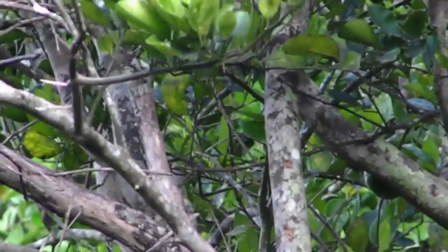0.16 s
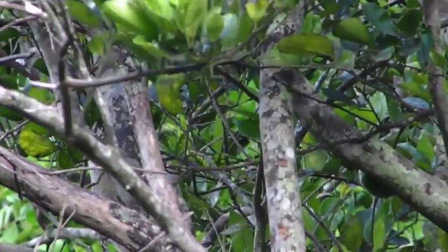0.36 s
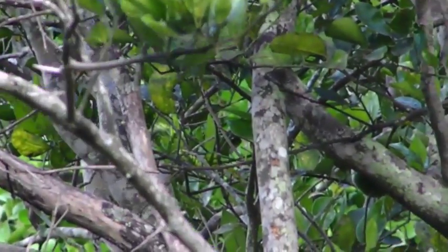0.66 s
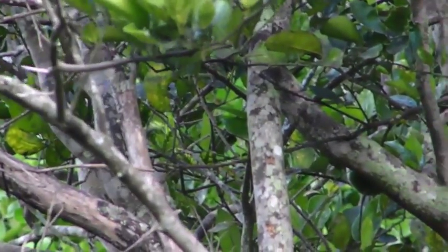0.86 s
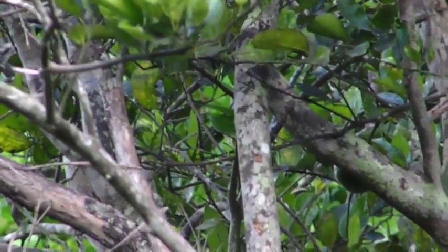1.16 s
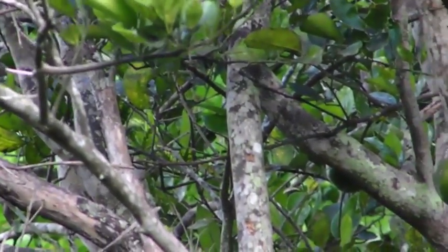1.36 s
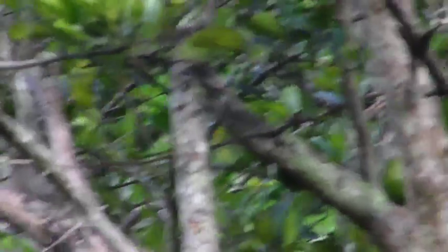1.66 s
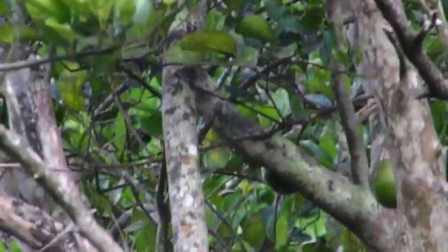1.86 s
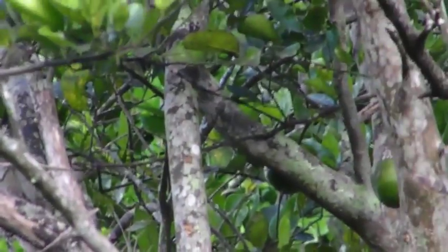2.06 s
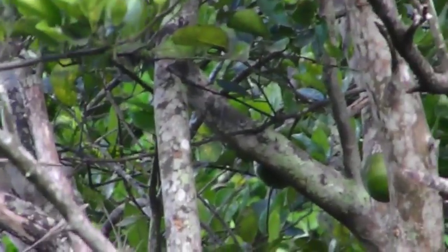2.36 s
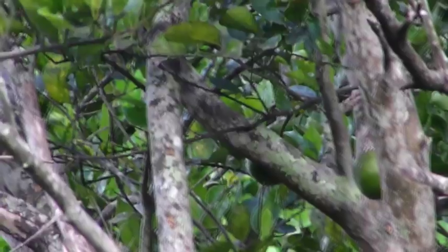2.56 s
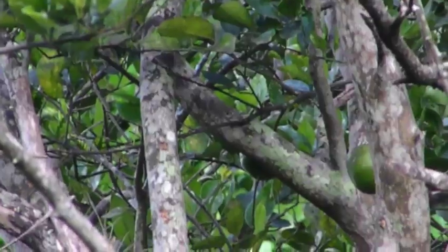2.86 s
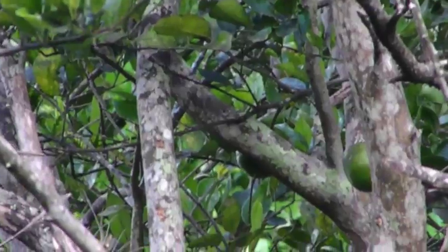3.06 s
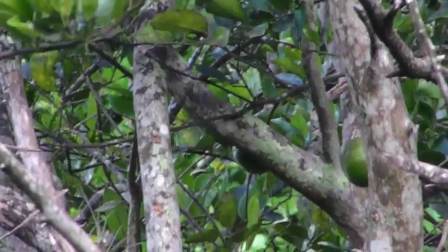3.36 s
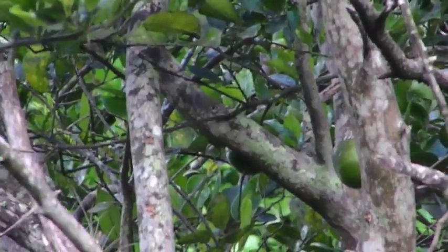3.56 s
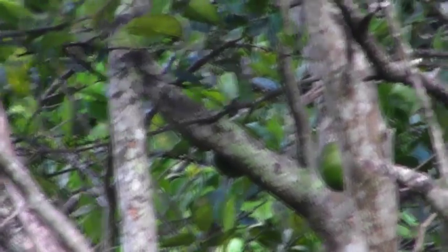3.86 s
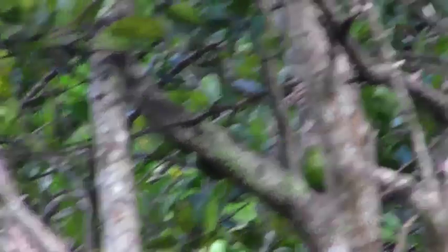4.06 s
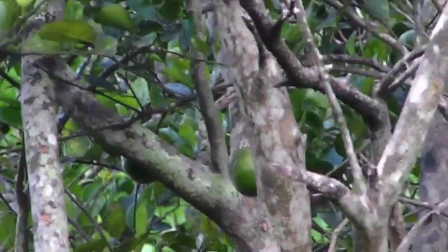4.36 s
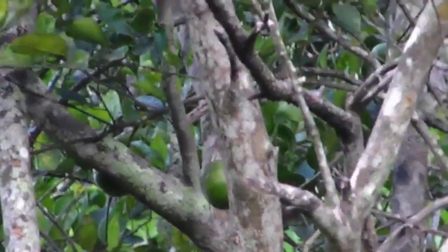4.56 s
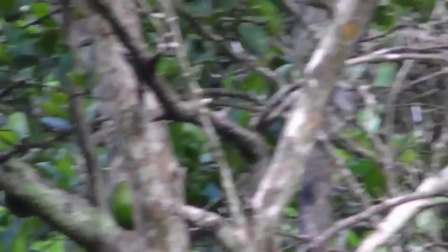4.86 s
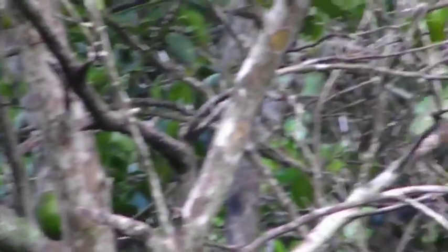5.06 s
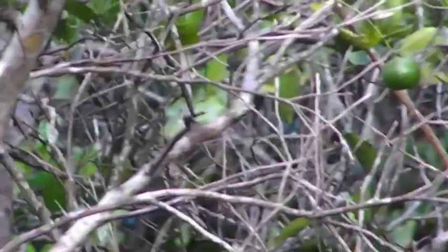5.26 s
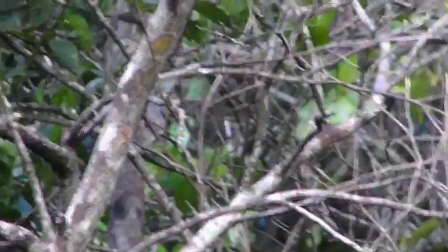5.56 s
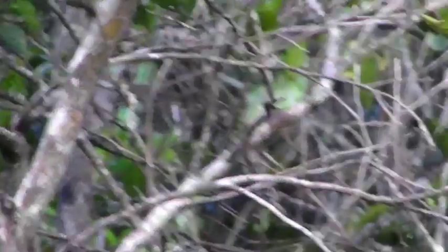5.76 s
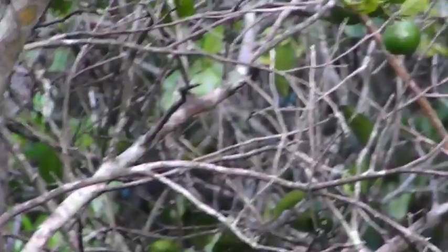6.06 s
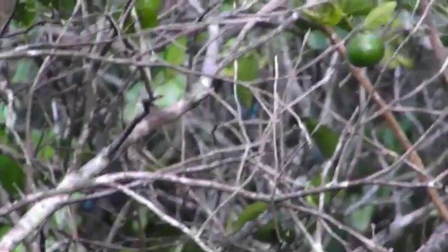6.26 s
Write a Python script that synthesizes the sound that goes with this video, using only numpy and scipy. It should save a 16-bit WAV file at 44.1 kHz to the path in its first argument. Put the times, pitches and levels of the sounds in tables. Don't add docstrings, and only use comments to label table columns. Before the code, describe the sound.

Four raspy, spaced bird screams ring out among garden trees above buzzing insects, with a faint distant rattle, tiny chips and late cracking twigs.

```python
import sys
import numpy as np
from scipy import signal
from scipy.fft import rfft, irfft, next_fast_len
from scipy.io import wavfile

SR = 44100
rng = np.random.default_rng(int(sys.argv[2]) if len(sys.argv) > 2 else 0)


def invert_db(level):
    return 10 ** (np.asarray(level, dtype=float) / 20)


def to_wav(s):
    ch = np.atleast_2d(s).T
    pcm = np.round(np.clip(ch, -1, 1) * 32767)
    wavfile.write(sys.argv[1], SR, pcm.astype(np.int16))


N = 282681


def columns(rows, t):
    s, *values = np.transpose(rows)
    return [np.interp(t, s, v) for v in values]


def at_hz(points, hz):
    point_hz, point_db = np.array(points).T
    return np.interp(np.log(hz + 1), np.log(point_hz), point_db)


def coloured(x, points):
    size = next_fast_len(len(x))
    gain = invert_db(at_hz(points, np.fft.rfftfreq(size, 1 / SR)))
    return irfft(rfft(x, size) * gain, size)[:len(x)]


def rms_one(x):
    return x / np.sqrt(np.mean(x ** 2) + 1e-20)


def drift(rate_hz, size):
    r = np.exp(-2 * np.pi * rate_hz / SR)
    noise = rng.standard_normal(size + 8000)
    return rms_one(signal.lfilter([1], [1, -2 * r, r * r], noise)[8000:])


def ring(x, hz, width_hz):
    r = np.exp(-np.pi * width_hz / SR)
    poles = [1, -2 * r * np.cos(2 * np.pi * hz / SR), r * r]
    return signal.lfilter([(1 - r * r) / 2, 0, (r * r - 1) / 2], poles, x)


def add(out, s, x):
    i = round(s * SR)
    out[i:i + len(x)] += x[:N - i]


def scream(rows):
    # (frequency [Hz], level [dB])
    throat = [(900, -74), (1330, -27.5), (1500, -13.5), (1900, -26.5), (2350, -9.5), (3150, -2.5),
              (3550, -11.5), (3750, -12), (4000, -13.5), (4800, -12.5), (6200, -4.5), (7600, -22)]
    t = np.arange(rows[0][0], rows[-1][0], 1 / SR)
    half_hz, level_db, upper_db = columns(rows, t)
    age, left = t - t[0], t[-1] - t

    doubling_db = -2.5 - 17 * np.clip(1 - (age - .049) / .051, 0, 1)
    flutter = .1 + .8 * np.exp(-age / .06) + .45 * np.exp(-left / .04)
    breath_db = -12.5 + 8 * np.exp(-age / .02) + 7 * np.exp(-left / .03)

    half_hz = half_hz * (1 - 0.1967 * np.exp(-age / 0.0073))
    waver = .007 * drift(35, len(t)) + (.007 + .008 * flutter) * drift(400, len(t))
    phase = 2 * np.pi * np.cumsum(half_hz * (1 + waver)) / SR
    flap = phase / 3 + 1.1 * drift(70, len(t))
    low_fade_db = -14 * np.exp(-left / .03)

    voice = np.zeros(len(t))
    for k in range(2, 11):
        upper = np.clip((k * half_hz - 4600) / 900, 0, 1)
        patches_db = (2.6 + .25 * k) * drift(65, len(t))
        partial = invert_db(upper * upper_db + k % 2 * doubling_db + patches_db + (k < 4) * low_fade_db)
        strand = flutter * (1 if k < 5 else .45)
        for side, share in (-1, .6 * strand), (0, 1), (1, 1.35 * strand):
            gain = share * partial * invert_db(at_hz(throat, (k + side / 3) * half_hz))
            voice += gain * np.sin(k * phase + side * flap + k * k)

    breath = rng.standard_normal(len(t)) * (1 + 0.6 * np.cos(2 * phase))
    breath_curve = [(1000, -29.5), (2100, -11.0), (3100, 0), (4200, 0.0), (6300, -1), (7800, -7.0)]
    breath = rms_one(coloured(breath, breath_curve))
    edges = np.minimum(1, np.minimum(age, left) / 0.00077)
    return invert_db(level_db) * edges * (voice + invert_db(breath_db) * breath)


def jay():
    # (time [s], half pitch [Hz], level [dB], beak opening as upper throat band [dB])
    screams = [
        [(1.121, 798, -45.5, 4.5), (1.15, 809, -32.5, -0.5), (1.19, 814.6, -26, 6), (1.235, 811, -34, 1),
         (1.3, 765, -29.5, 4.5), (1.37, 734, -28.5, -10.5), (1.41, 734.5, -31, -0.5)],
        [(2.092, 849, -41, -1), (2.122, 851, -29, -4), (2.158, 823.5, -22.5, 0), (2.195, 816.5, -29.5, 0.5),
         (2.23, 784, -29.5, -18), (2.265, 778, -24, -2), (2.33, 713, -27.5, -1.5), (2.38, 726, -31, -14)],
        [(3.779, 825, -48, 1), (3.8, 828, -27, -10.5), (3.86, 819, -28.5, -8), (3.95, 788.7, -27.5, -6),
         (3.995, 773.6, -24.5, -5.5), (4.025, 740.6, -28.5, 1), (4.06, 738.5, -34, -0.5)],
        [(5.008, 797, -52, -1), (5.035, 808.5, -28.5, -8.5), (5.1, 783.7, -28.5, -6), (5.16, 767, -31, -5),
         (5.215, 751.5, -27.5, 2), (5.265, 741, -30, -9.5), (5.3, 754.5, -30.5, -17)],
    ]
    out = np.zeros(N)
    for rows in screams:
        add(out, rows[0][0], scream(rows))
    return out


def snaps():
    # (time [s], peak [dB], ring [Hz], brightness [dB], t60 [s])
    twig_ticks = [(0.3714, -35, 4260, -18, 0.018), (0.5894, -46, 1620, -21, 0.018),
                  (1.6634, -32, 2060, -39, 0.018), (1.6705, -23.5, 2200, -40, 0.05),
                  (3.2114, -38.5, 4600, -8, 0.014), (4.3824, -51, 3110, -13, 0.018),
                  (4.4873, -28.5, 1640, -14, 0.011), (4.5331, -32, 3320, -13, 0.018),
                  (4.5814, -33, 3230, -16, 0.018), (4.604, -35, 2830, -19, 0.022),
                  (5.6106, -32.5, 3010, -20, 0.019), (5.8326, -36, 4500, -7, 0.02),
                  (5.8448, -26.5, 3200, -14, 0.024), (5.9644, -36, 3660, -16, 0.02),
                  (5.979, -28.5, 2260, -4, 0.02), (6.219, -28, 2780, -18, 0.033)]
    # (time [s], peak [dB], ring [Hz], brightness [dB], t60 [s])
    twig_snaps = [(4.3226, -36, 3600, 21, 0.075), (5.747, -25.5, 4180, -20, 0.1),
                  (5.8025, -38, 3280, -11, 0.05), (5.87, -28.5, 3580, -5, 0.03),
                  (6.0044, -40, 4020, 24, 0.051), (6.0436, -15, 2210, -19, 0.045),
                  (6.0597, -17.5, 3690, -28, 0.014), (6.1074, -49, 3590, -11, 0.053),
                  (6.2403, -24.5, 2640, -16, 0.054), (6.2565, -30, 4330, -5, 0.07),
                  (6.3068, -32, 3840, -15, 0.066)]
    # (time [s], peak [dB], ring [Hz], brightness [dB], t60 [s])
    wing_beats = [(0.842, -32, 4110, -29, 0.1), (0.8873, -31, 3640, -16.5, 0.14),
                  (0.9244, -25, 2390, 3, 0.14), (2.897, -45, 3800, -18, 0.19),
                  (2.946, -36, 4160, -19, 0.043), (4.6602, -38.5, 3340, -24.5, 0.052),
                  (4.702, -44, 3320, -9, 0.053)]
    # (time [s], rms level [dB], ring [Hz], t60 [s])
    knocks = [(3.868, -38, 740, .045), (6.045, -39, 1080, .03), (6.241, -43, 1400, .06),
              (6.289, -42, 1180, .07), (6.309, -44, 1400, .08)]
    out, t = np.zeros(N), np.arange(round(.15 * SR)) / SR
    bursts = [*twig_ticks, *twig_snaps, *wing_beats]
    cracks = rng.standard_normal((len(bursts) + len(knocks), len(t)))
    for (s, peak_db, hz, bright_db, t60), crack in zip(bursts, cracks):
        onset = np.minimum(1, t / (.4 * t60 ** 2 + 1e-4))
        burst = crack * invert_db(-60 * t / max(t60, .005)) * onset
        dull = ring(burst, hz, 530) * 1.63 + ring(ring(burst, 2900, 5000), 3300, 6000)
        bright = ring(ring(burst, 6800, 2200), 3900, 2800)
        add(out, s, invert_db(peak_db - 7.5) * (dull + invert_db(bright_db - 5.5) * bright))
    for (s, peak_db, hz, t60), crack in zip(knocks, cracks[::-1]):
        add(out, s, invert_db(peak_db - 60 * t / t60) * rms_one(ring(crack, hz, 200)))
    return out


def chips():
    # (time [s], peak [dB], start [Hz], end [Hz], length [s])
    calls = [
        (0.04, -30.5, 7900, 6300, .008),
        (3.336, -28.5, 8000, 6000, 0.008),
        (4.982, -30, 8200, 5900, 0.0087),
        (6.5, -40.5, 9800, 8600, 0.0037),
        (5.744, -29.5, 7800, 5200, 0.0039),
    ]
    shadow_db = [-40, -40, -40, 0, 0]
    sung, direct = np.zeros((2, N))
    for (s, peak_db, start_hz, end_hz, length), hidden_db in zip(calls, shadow_db):
        part = np.arange(0, 1, 1 / (length * SR))
        phase = 2 * np.pi * np.cumsum(start_hz + (end_hz - start_hz) * part) / SR
        chip = invert_db(peak_db) * np.sin(np.pi * part) ** 0.17 * np.sin(phase)
        add(sung, s, chip)
        add(direct, s, invert_db(hidden_db) * chip)
    return sung, direct


def rattle_notes():
    # (time [s], first gap [s], peak [dB], pitch [Hz])
    runs = [(0.0554, .054, -47, 4150), (0.148, .044, -47, 4050), (0.2943, .055, -48, 4100),
            (0.9682, .049, -46.5, 4100), (1.628, .0418, -48, 4300), (1.958, .047, -47, 4200),
            (2.9068, .0352, -45, 4450), (3.384, .054, -44, 4500), (3.535, .0475, -45, 4450),
            (4.6686, .0362, -44, 4420)]
    counts = [2, 3, 4, 3, 7, 3, 11, 3, 5, 8]
    notes = []
    for (s, gap, db, hz), count in zip(runs, counts):
        for k in range(count):
            slowing = .0013 * k * (k - 1) / 2
            notes.append((s + k * gap + slowing, db, hz))
    spread_db, spread_hz = 1.5, 70
    return np.array(notes) + rng.standard_normal((len(notes), 3)) * [0, spread_db, spread_hz]


def rattle():
    out, t = np.zeros(N), np.arange(round(.04 * SR)) / SR
    notes = rattle_notes()
    husk = rng.standard_normal((len(notes), 2, len(t)))
    shape = (t / .004) ** 2 * np.exp(2 - t / .002)
    shape = shape + .5 * (t / 0.0067) * np.exp(1 - t / 0.0069)
    for (s, peak_db, hz), (body, hiss) in zip(notes, husk):
        sag = np.sin(2 * np.pi * np.cumsum(hz * (1.06 - 9 * t)) / SR)
        whistle = sag * (1 + 0.55 * rms_one(ring(body, 240, 480)))
        husky = 0.36 * rms_one(ring(ring(body, 3900, 1700), 4600, 2200))
        puff = invert_db(-11) * rms_one(ring(ring(hiss, 6800, 2000), 6800, 2400))
        add(out, s - .002, invert_db(peak_db - 5.5) * shape * (whistle + husky + puff))
    return out


def garden(x, rise_s):
    # (center [Hz], width [Hz], level [dB], t60 [s])
    bands = [(1420, 1600, -6.5, 0.63), (2830, 1900, -2, 0.62), (3640, 4000, 4.5, 0.29),
             (6200, 3700, 4, 0.58)]
    t = np.arange(SR) / SR
    tail = np.zeros(SR)
    for hz, width_hz, db, t60 in bands:
        grains = ring(ring(rng.standard_normal(SR), hz, width_hz), hz, width_hz)
        tail += rms_one(grains) * invert_db(db - 60 * t / t60)
    tail = tail * np.clip((t - .003) / rise_s, 0, 1)
    return signal.fftconvolve(x, tail / np.sqrt(np.sum(tail ** 2)))[:N]


def insects(level_db):
    out, t = np.zeros(N), np.arange(N) / SR
    for hz, per_s in zip(np.linspace(5080, 5440, 12), rng.uniform(95, 135, 12)):
        pulses = (1 + np.cos(2 * np.pi * per_s * t + hz)) ** 1.8
        out += ring(ring(pulses * rng.standard_normal(N), hz, 320), hz, 400)
    return invert_db(level_db + 0.91 * drift(0.97, N)) * rms_one(out)


def suburb(level_db):
    # (frequency [Hz], spectral density [dB per Hz])
    spectrum = [(18, -62), (30, -27.5), (65, -15), (124, -3), (404, -8), (546, -8.5), (599, -8), (673, -11),
                (738, -10), (1170, -17), (2360, -26), (3420, -28), (3840, -26), (5310, -13), (7700, -31.5),
                (10000, -104), (16900, -120)]
    air = [(hz, db) for hz, db in spectrum if not 4600 < hz < 5900]
    return invert_db(level_db + 0.31 * drift(3.3, N)) * rms_one(coloured(rng.standard_normal(N), air))


def scene():
    loud, twigs, (small, small_direct), far = jay(), snaps(), chips(), rattle()
    echo = garden(invert_db(-6.3) * loud + invert_db(-7.5) * far + invert_db(-8.0) * twigs, rise_s=0.0015)
    echo = echo + garden(invert_db(-7) * small, rise_s=.02)
    direct = invert_db(.3) * loud + far + small_direct + twigs
    return (direct + echo + insects(level_db=-52) + suburb(level_db=-48))[None]


def roll_off(x):
    return signal.sosfilt(signal.butter(12, 9070, fs=SR, output="sos"), x)


def record(dry):
    # (frequency [Hz], level [dB])
    passband = [(7000, -0.5), (7500, 0.5), (7750, -10), (7900, -42.5), (7990, -62.5)]
    # (frequency [Hz], level [dB])
    mirror = [(8010, 10.5), (8400, -13), (8800, -25), (9100, -44), (9180, -60)]
    rate_hz = 16000
    band = coloured(dry[0], passband)
    image = 2 * band * np.cos(2 * np.pi * rate_hz * np.arange(N) / SR)
    image = coloured(image, [(7000, -200), *mirror, (12000, -200)])
    return roll_off((band + image)[None])


dry = scene()
out = record(dry)
to_wav(out)
```